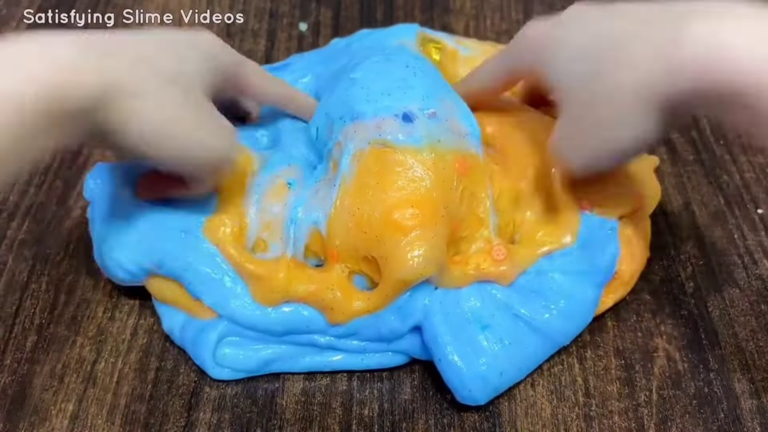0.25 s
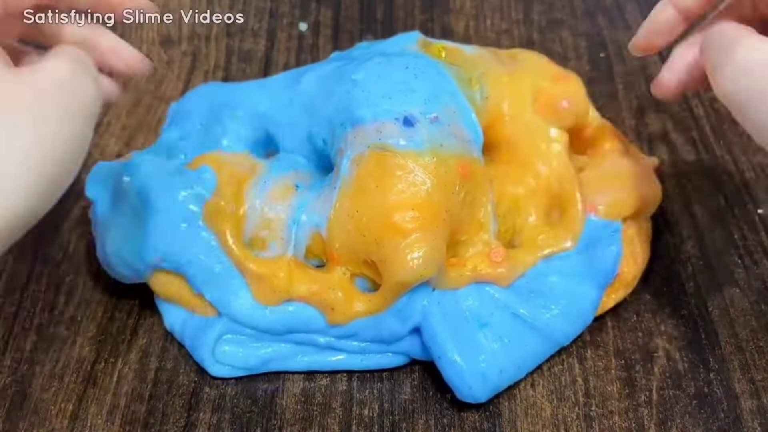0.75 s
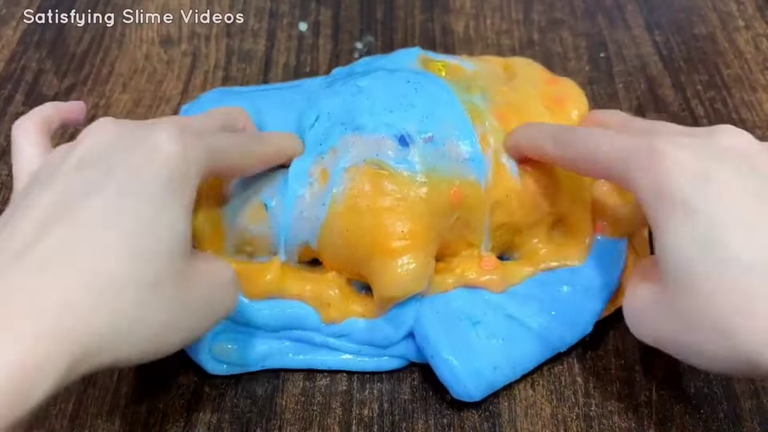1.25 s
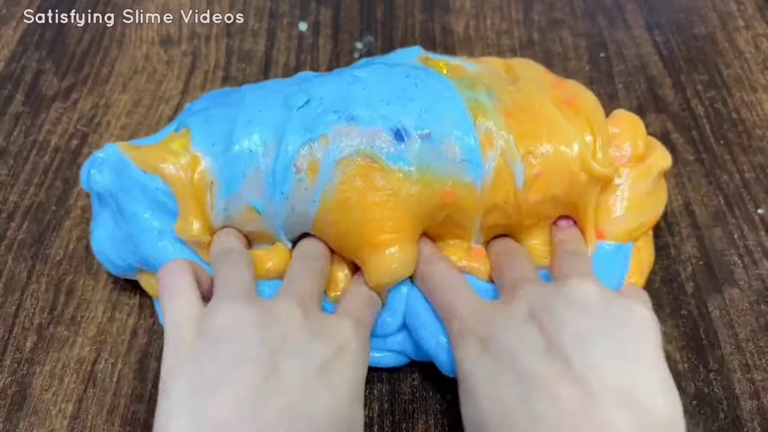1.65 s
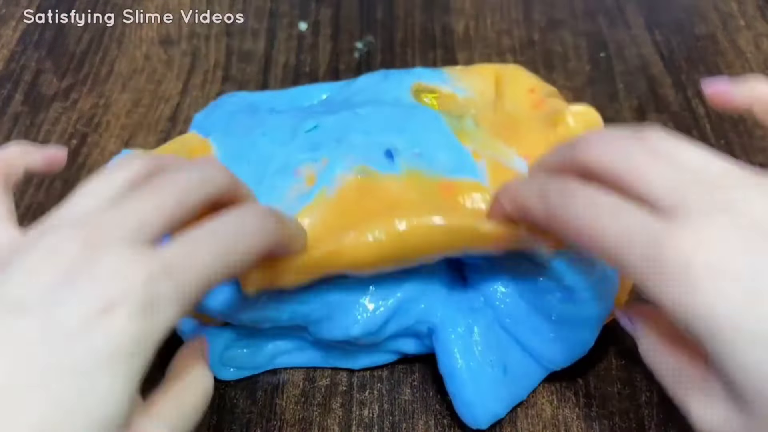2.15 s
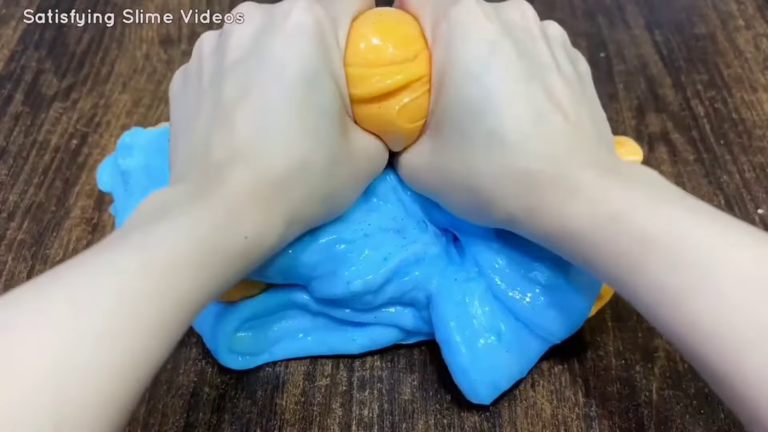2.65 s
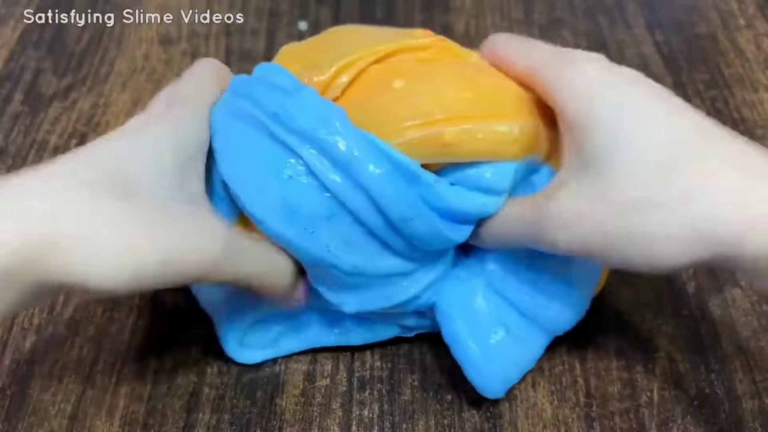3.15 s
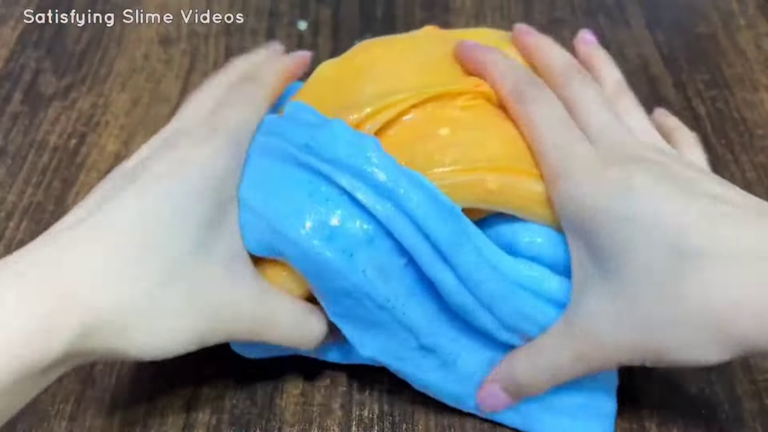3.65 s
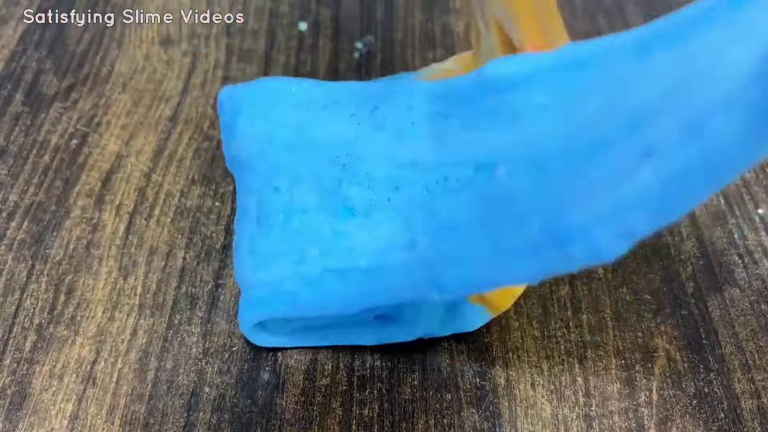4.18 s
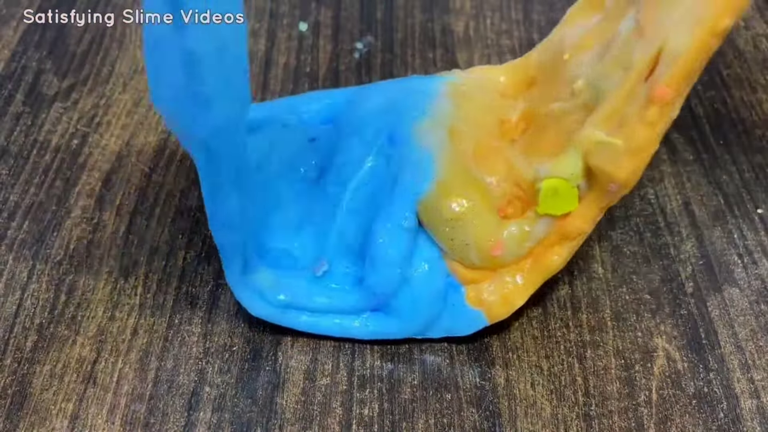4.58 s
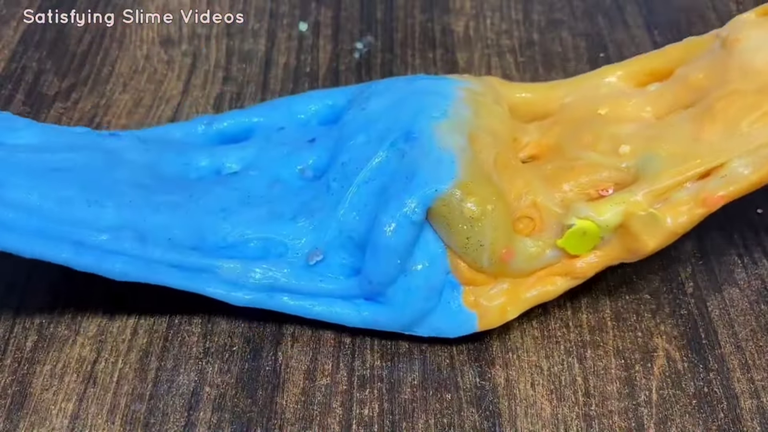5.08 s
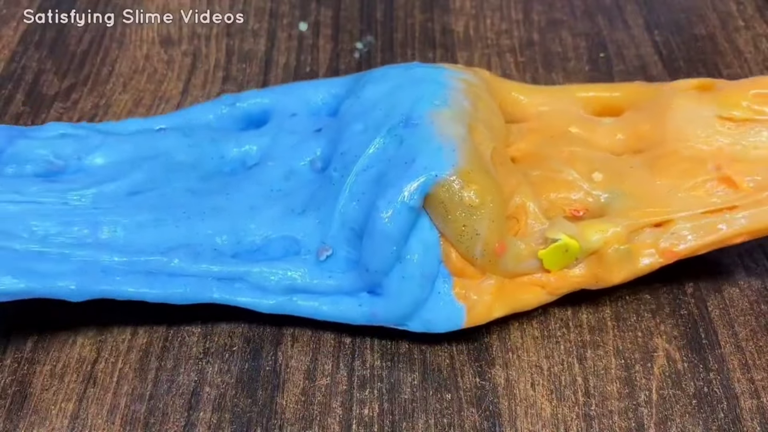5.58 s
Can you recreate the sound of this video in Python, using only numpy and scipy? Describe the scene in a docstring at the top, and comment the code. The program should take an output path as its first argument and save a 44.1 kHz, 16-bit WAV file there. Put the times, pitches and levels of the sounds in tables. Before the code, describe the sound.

Very close, dry indoor stereo of glossy slime handled on a wooden table. Uneven wet squelches and bright bubble crackles start with a poke, peak in loud snaps near 0.8 and 1.5 seconds, continue as busy squeezing and folding with popping air, then drop after four seconds to faint ticks and fizz during stretching.

```python
"""A lump of wet slime on a table, close to the microphone, is poked, folded and stretched by two hands.
Each squeeze drives trapped air out in a squelch (sputtering noise through a hollow) and bursts a fizz of bubbles;
narrow folds sing as gliding resonances, larger pockets pop one by one as a noisy snap and a short ring.
The pressed mass thuds softly as low noise and brief swings, over a faint room tone.
At the end the slime is pulled into a sheet and only ticks and fizzes."""
import sys
import numpy as np
from scipy import signal
from scipy.fft import rfft, irfft, next_fast_len
from scipy.io import wavfile
from scipy.ndimage import uniform_filter1d, map_coordinates

SR = 44100
rng = np.random.default_rng(int(sys.argv[2]) if len(sys.argv) > 2 else 0)


def waveform_to_disk(signal):
    """Save audio, clipped to [-1, 1], as 16-bit WAV at the path in sys.argv[1]."""
    frames = np.transpose(np.atleast_2d(signal))
    scaled = np.clip(frames, -1, 1) * 32767
    samples = np.round(scaled).astype(np.int16)
    wavfile.write(sys.argv[1], SR, samples)


N = 256662

# strokes of the hands, squeezing or pulling; levels stand before each layer's gain:
# (full at [s], swell [s per 20 dB], hold [s], release of the fizz [s per 20 dB],
#  fizz level [dB], fizz tilt [dB per octave], squelch level [dB], squelch pitch [Hz])
HAND_STROKES = [(0.003, 0.109, 0.105, 0.034, -49.6, -2.1, -51.5, 600.0),
                (0.111, 0.028, 0.009, 0.008, -48.3, -4.8, -47, 480),
                (0.221, 0.047, 0.021, 0.038, -29.6, -1.0, -37.4, 540.0),
                (0.349, 0.055, 0.006, 0.032, -54.7, 1.1, -69.8, 570.0),
                (0.441, 0.052, 0.007, 0.028, -62.1, -0.1, -53.7, 400.0),
                (0.829, 0.043, 0.016, 0.03, -18.3, 0.7, -27.3, 580.0),
                (0.997, 0.044, 0.006, 0.045, -74.8, -3.5, -59, 200.0),
                (1.137, 0.472, 0.023, 0.051, -63.1, 0.4, -68, 760.0),
                (1.485, 0.042, 0.009, 0.031, -21.3, -1.3, -26, 520),
                (1.529, 0.042, 0.006, 0.029, -28.3, 0.1, -39.1, 380.0),
                (1.816, 0.203, 0.006, 0.074, -43.5, 4.3, -56.9, 950.0),
                (1.924, 0.135, 0.107, 0.044, -53.5, 2.1, -66.3, 710.0),
                (2.146, 0.157, 0.005, 0.043, -49.2, -0.5, -62.4, 1130.0),
                (2.22, 0.039, 0.004, 0.032, -45.5, 2.3, -57.8, 1000.0),
                (2.28, 0.056, 0.059, 0.051, -35.8, -1.6, -41, 1420.0),
                (2.369, 0.047, 0.02, 0.023, -39.9, 3.0, -55.6, 780.0),
                (2.492, 0.095, 0.01, 0.027, -47.4, -0.4, -52.8, 1560.0),
                (2.59, 0.137, 0.07, 0.031, -52.7, 0.9, -54.4, 600.0),
                (2.738, 0.126, 0.005, 0.063, -44.0, 3.0, -47.7, 680.0),
                (2.829, 0.173, 0.075, 0.056, -59.3, -0.4, -61.5, 1200.0),
                (3.08, 0.051, 0.054, 0.05, -29.8, -3.4, -31.2, 1140.0),
                (3.275, 0.129, 0.001, 0.056, -38.6, -1.7, -45.9, 1440.0),
                (3.305, 0.048, 0.11, 0.045, -46.4, -0.6, -45.7, 760.0),
                (3.455, 0.05, 0.02, 0.032, -27.0, -2.8, -31.7, 810.0),
                (3.534, 0.059, 0.005, 0.048, -39.3, 3.0, -49.8, 600.0),
                (3.592, 0.076, 0.003, 0.019, -48.1, -0.6, -58.8, 570.0),
                (3.772, 0.12, 0.037, 0.042, -48.9, 1.2, -51.7, 980.0),
                (3.906, 0.09, 0.01, 0.052, -43.6, -1.7, -47.4, 1230.0),
                (4.322, 0.3, 0.012, 0.066, -73, 0.5, -78, 580.0),
                (4.446, 0.114, 0.006, 0.024, -56.8, -1.6, -69.2, 1180.0),
                (4.947, 1.03, 0.123, 0.081, -61.9, -0.1, -76, 640.0),
                (5.285, 0.155, 0.03, 0.047, -69.9, -3.0, -77.5, 790.0),
                (5.499, 0.6, 0.049, 0.045, -66.7, -0.4, -74, 740.0),
                (5.614, 0.095, 0.019, 0.043, -58.2, -4.5, -63.1, 1560.0),
                (5.745, 0.129, 0.051, 0.04, -53.1, -1.6, -59.7, 1270.0)]
# the mass pressed on the table: (time [s], pitch [Hz], level before each layer's gain [dB])
TABLE_PRESSES = [(0.045, 120, -52), (0.11, 100, -58), (0.208, 122, -32), (0.56, 48, -60), (0.59, 55, -61),
                 (0.684, 50, -62), (0.815, 150, -49), (0.935, 110, -45), (0.985, 56, -34.5),
                 (1.47, 120, -40), (2.28, 92, -57), (2.585, 110, -60), (3.08, 137, -48), (3.335, 110, -58),
                 (3.585, 58, -55), (3.696, 84, -60), (3.78, 96, -61)]
# air pockets bursting, before the pops' own gain and stretches:
# (time [s], cavity pitch [Hz], length [ms], level over 2 ms [dB], snap tilt [dB per octave])
AIR_POCKETS = [(0.2295, 6070, 1.3, -15, 0), (0.354, 6320, .8, -48, 5), (0.4282, 7180, .5, -52.5, 3),
               (0.4477, 7430, .4, -43, -2.5), (0.8196, 6580, .9, -16, 1), (0.824, 6520, 1.0, -16, .5),
               (0.8454, 435, 2.2, -19, -4.5), (0.8499, 6250, 2.4, -16, -.5), (1.0492, 430, 1.3, -35.5, -8),
               (1.1731, 7220, .5, -51, 2), (1.2466, 1194, .9, -56, -3.5), (1.4759, 679, 2.4, -18, 1),
               (1.4791, 7350, .45, -14.5, -1), (1.4839, 7540, .9, -21, -2.5), (1.4963, 5120, .6, -14.5, 3),
               (1.5316, 5320, 1.0, -23.5, 3), (1.709, 7800, .8, -45, -3.5), (1.9278, 7570, .5, -39, 3.5),
               (1.9759, 7490, .4, -31, 9), (2.0297, 6910, .5, -45, 2.5), (2.0584, 3430, .8, -46, 4),
               (2.147, 2640, .5, -49, -2), (2.5882, 451, 1.6, -43, 0), (2.64, 2070, .8, -41, -3.5),
               (2.659, 6600, .9, -43, -1), (2.7477, 7360, 2.2, -38, -1.5), (2.8274, 2090, .6, -43, -.5),
               (3.0873, 3570, 2.0, -17.5, -3.5), (3.2801, 3900, .55, -21, 1.5),
               (3.3481, 1086, .7, -25.5, -6), (3.4598, 3780, .3, -16, -3.5), (3.4776, 3998, .3, -9, -.5),
               (3.536, 7660, .6, -25, 8), (3.5948, 7700, 1.5, -35, 1.5), (3.6472, 1394, .45, -41.5, -2),
               (3.809, 7060, .5, -43, 2), (3.906, 2480, 1.0, -32, -3.5), (4.3299, 7370, .5, -51, 4.5),
               (4.4495, 3104, 1.0, -45.5, 2), (4.6842, 6060, .9, -55, 6.5), (4.9339, 6370, .6, -51, 5.5),
               (4.9744, 5790, 1.0, -45, .5), (5.1272, 2820, 1.5, -51, 0), (5.4433, 6800, .6, -52, 7.5),
               (5.5031, 7590, .7, -48, 10), (5.6131, 6450, .6, -50, -.5), (5.7688, 4010, .4, -41, 1.5)]
# narrow air channels that sing as they are squeezed, before their gain:
# (start [s], end [s], start pitch [Hz], end pitch [Hz], level relative to the stroke [dB])
AIR_CHANNELS = [(0.73, 0.86, 330, 400, -15), (0.93, 1.04, 190, 520, 8), (1.491, 1.55, 334, 310, -15),
                (1.98, 2.025, 606, 600, -10.5), (2.24, 2.32, 1760, 1750, -5.5),
                (2.25, 2.345, 1020, 1200, -9), (2.304, 2.37, 2000, 2480, -1), (2.86, 2.93, 1030, 1800, -7),
                (3.088, 3.155, 2180, 1950, -6), (3.2, 3.295, 3150, 4350, -6),
                (3.469, 3.505, 3737, 4500, -4), (3.5, 3.56, 5500, 7900, -10.5), (3.68, 3.77, 563, 1250, -6),
                (3.92, 3.975, 2350, 1850, -1), (5.725, 5.795, 2400, 2200, -8)]
# relative tone of a tearing wet film at the microphone: (frequency [Hz], level per Hz [dB])
FILM_TONE = [(150.0, -18), (400.0, -6), (1700.0, -8.0), (2500.0, -4.5), (4200.0, -3), (5400.0, -5.0),
             (6600.0, -2), (7900.0, -3), (8700.0, -13), (9700.0, -25.5), (11000.0, -11), (12500.0, -7.5),
             (14800.0, -10), (16000.0, -22)]
# stereo width at the microphone: (frequency [Hz], side minus mid [dB])
STEREO_WIDTH = [(60, -11), (110, -8), (200, -7), (380, -8), (700, -6), (1290, -4), (2380, -4), (4400, -3),
                (8120, -4), (15000, -1)]
# relative tone of the room noise: (frequency [Hz], level per Hz [dB])
ROOM_SPECTRUM = [(15, -30), (25, 0), (80, 0), (677, -9.5), (1260, -14.5), (3920, -10), (5140, -14),
                 (6920, -11.5), (8140, -15), (9840, -29.5), (11600, -18.5), (14800, -13), (16000, -31)]

ROOM_TONE_DB = -75
CUTOFF_HZ = 15900
SWELL_POWER = .9   # under 1, a stroke steepens towards its peak
SQUELCH_HASTE = 1.28   # the squelch dies this much faster than the fizz
# every stroke also drags the mass, by a share of the squelch's swing in dB
DRAG_DB, DRAG_FOLLOWS, DRAG_HZ = -38, .58, 70
PRESS_RISE_DB_PER_S, PRESS_FALL_DB_PER_S = 380, 480
# the smaller the pocket, the higher its pitch and the more it snaps rather than rings
POCKET_HZ, SNAP_DB_PER_OCTAVE = 3400, 1.2


def from_db(db):
    """Decibels to gain."""
    return 10 ** (np.asarray(db) / 20)


def rms_one(x):
    """Scale to unit power."""
    return x / np.sqrt(np.mean(x ** 2) + 1e-20)


def at_hz(points, hz):
    """A spectrum table read on a log-frequency axis."""
    known, values = np.transpose(points)
    return np.interp(np.log(hz + 1), np.log(known), values)


def resonance(hz, centre_hz, q):
    """Gain of a damped cavity."""
    return 1 / np.sqrt(1 + (q * (hz / centre_hz - centre_hz / hz)) ** 2)


def film(hz, tilt_db):
    """Gain of bursting film; a positive tilt, as of thinner film, favours the treble."""
    octaves = np.log2(np.clip(hz, 300, 16000) / 1000)
    return from_db(at_hz(FILM_TONE, hz) + tilt_db * octaves)


def hollows(hz, s, depth_db, width_hz, life_s):
    """Gain of the many shifting hollows between the fingers: peaks and dips that come and go."""
    field = rng.standard_normal((400, 400))
    where = np.broadcast_arrays(hz / width_hz, s / life_s)
    return from_db(depth_db * map_coordinates(field, where, order=3, mode="wrap"))


def stereo_noise():
    """Noise of unit power, more alike in both channels in the bass and wide in the treble."""
    size = next_fast_len(N)
    mid, side = rfft(rng.standard_normal((2, size)))
    width = from_db(at_hz(STEREO_WIDTH, np.fft.rfftfreq(size, 1 / SR)))
    left_right = mid + side * width * [[1], [-1]]
    return irfft(left_right / np.sqrt(1 + width ** 2), size)[:, :N]


def moving_filter(x, gain_at, size):
    """Colour x by gain_at(Hz, s), scaled so that white noise keeps its power."""
    hz, s, frames = signal.stft(x, SR, nperseg=size)
    gain = gain_at(hz[:, None] + 1, s)
    gain = gain / np.sqrt(np.mean(gain ** 2, axis=0))
    return signal.istft(frames * gain, SR, nperseg=size)[1][:, :x.shape[1]]


def swarm(per_s, spread_db, grain_ms, smooth_share):
    """Tiny bursts of uneven size, each dying quickly, over a blur of still smaller ones."""
    struck = rng.random(N) < per_s / SR
    energy = struck * from_db(spread_db * np.minimum(rng.exponential(1, N), 4)) ** 2
    decay = np.exp(-1e3 / (grain_ms * SR))
    power = signal.lfilter([1], [1, -decay], energy + 1e-18)
    power = power / uniform_filter1d(power, size=1800)   # the hand, not chance, sets the loudness
    share = np.clip(smooth_share, 0, 1)
    return stereo_noise() * np.sqrt(share + (1 - share) * np.abs(power))


def strokes(s, haste, levels_db, colours):
    """Each stroke swells, holds and falls away; gives their joint gain and the colour of those that prevail."""
    full_s, swell_s, hold_s, release_s = np.transpose(HAND_STROKES)[:4, :, None]
    coarse = np.arange(0, N / SR, .001)
    swell_db = 20 * (np.maximum(full_s - coarse, 0) / swell_s) ** SWELL_POWER
    fall_db = 20 * haste / release_s * np.maximum(coarse - full_s - hold_s, 0)
    power = from_db(levels_db[:, None] - swell_db - fall_db) ** 2 + 1e-20
    total = power.sum(axis=0)
    gain = np.interp(s, coarse, np.sqrt(total))
    return gain, np.interp(s, coarse, colours @ power / total)


def fizzing(s):
    """Gain and tilt of the fizz at the times s."""
    *_, level_db, tilt_db, _, _ = np.transpose(HAND_STROKES)
    return strokes(s, 1, level_db, tilt_db)


def squelching(s):
    """Gain and pitch of the squelch at the times s."""
    *_, level_db, pitch_hz = np.transpose(HAND_STROKES)
    return strokes(s, SQUELCH_HASTE, level_db, pitch_hz)


def pressing(s):
    """Presses build up and ease off over the drag of the strokes; gives joint gain and prevailing pitch."""
    at_s, pitch_hz, level_db = np.transpose(TABLE_PRESSES)[:, :, None]
    coarse = np.arange(0, N / SR, .001)
    rise_db = PRESS_RISE_DB_PER_S * (at_s - coarse)
    fall_db = PRESS_FALL_DB_PER_S * (coarse - at_s)
    power = from_db(level_db - np.maximum(rise_db, fall_db)) ** 2
    drag = (from_db(DRAG_DB) * squelching(coarse)[0] ** DRAG_FOLLOWS) ** 2
    total = power.sum(axis=0) + drag
    mean_hz = ((pitch_hz * power).sum(axis=0) + DRAG_HZ * drag) / total
    return np.interp(s, coarse, np.sqrt(total)), np.interp(s, coarse, mean_hz)


def room_tone():
    """Faint steady noise of the room."""
    def colour(hz, s):
        return from_db(at_hz(ROOM_SPECTRUM, hz))
    return from_db(ROOM_TONE_DB) * moving_filter(stereo_noise(), colour, size=2048)


def fizz(low_edge_hz=2000, gain_db=-1.54):
    """Small bubbles break as sticky faces meet and part."""
    def colour(hz, s):
        ripple = hollows(hz, s, depth_db=3.0, width_hz=300, life_s=.045)
        return ripple * film(hz, fizzing(s)[1]) / np.sqrt(1 + (low_edge_hz / hz) ** 8)
    grains = swarm(per_s=940, spread_db=4.0, grain_ms=.3, smooth_share=0.61)
    level, _ = fizzing(np.arange(N) / SR)
    return from_db(gain_db) * level * moving_filter(grains, colour, size=512)


def squelch(q=0.62, low_edge_hz=245, high_edge_hz=2400, palm_hz=305, palm_q=2.0, palm_db=3.5,
            ripple_db=3.0, gain_db=-3.5):
    """Air sputters out of a fold, whose hollow changes pitch; the cupped hand adds a low resonance."""
    def colour(hz, s):
        edges = (1 + (low_edge_hz / hz) ** 8) * (1 + (hz / high_edge_hz) ** 8)
        palm = np.hypot(1, from_db(palm_db) * resonance(hz, palm_hz, palm_q))
        ripple = hollows(hz, s, depth_db=ripple_db, width_hz=190, life_s=.04)
        return ripple * palm * resonance(hz, squelching(s)[1], q) / np.sqrt(edges)
    grains = swarm(per_s=400, spread_db=4.0, grain_ms=.6, smooth_share=.4)
    level, _ = squelching(np.arange(N) / SR)
    return from_db(gain_db) * level * moving_filter(grains, colour, size=1024)


def thuds(q=0.37, overtone_ratio=2.7, flutter_db=2.5, flutter_s=.025, gain_db=-0.4):
    """The soft mass wobbles unevenly against the table under the knuckles."""
    def colour(hz, s):
        _, pitch_hz = pressing(s)
        return resonance(hz, pitch_hz, q) / np.sqrt(1 + (hz / (overtone_ratio * pitch_hz)) ** 6)
    s = np.arange(N) / SR
    wobble = moving_filter(stereo_noise(), colour, size=2048)
    # level the noise, so that presses and flutter set the loudness
    wobble = wobble / np.sqrt(uniform_filter1d(np.mean(wobble ** 2, axis=0), size=900))
    flutter = map_coordinates(rng.standard_normal(N), [s / flutter_s], order=1, mode="wrap")
    return from_db(flutter_db * flutter + gain_db) * pressing(s)[0] * wobble


def bumps(glide=0.21, length_ms=13.5, gain_db=-3):
    """At the height of a press the mass swings for a few cycles and stiffens as it is compressed."""
    s, out = np.arange(N) / SR, np.zeros(N)
    phases = rng.uniform(0, 2 * np.pi, len(TABLE_PRESSES))
    for (at_s, hz, level_db), phase in zip(TABLE_PRESSES, phases):
        age = (s - at_s) * 1e3 / length_ms   # in lengths of the bump
        near = np.abs(age) < 4
        turn = 2 * np.pi * np.cumsum(hz * (1 + glide * np.tanh(age[near]))) / SR
        bell = np.exp(-.5 * age[near] ** 2)
        out[near] += from_db(level_db + gain_db) * bell * np.sin(turn + phase)
    return out


def pops(opening=1.02, ring_stretch=1.2, snap_stretch=1.0, glide=0.069, skirt_db=-19, skirt_ms=4.0,
         low_edge_hz=380, gain_db=.5, snap_db=2.5, phase_spread=.35):
    """A pocket opens: its film snaps and its cavity rings, rising; a faint noise skirt lies before and after."""
    size = 2048
    ms = (np.arange(size) - size // 2) * 1e3 / SR
    hz = np.fft.rfftfreq(size, 1 / SR) + 1
    span = np.sqrt(.002 * SR / size)   # the level over 2 ms, as that of the whole window
    small_source = 1 / np.sqrt(1 + (low_edge_hz / hz) ** 6)   # radiates little bass
    out, noise = np.zeros((2, N + 2 * size)), stereo_noise()
    chance = rng.standard_normal((len(AIR_POCKETS), 2))
    age_ms = np.where(ms < 0, -ms / opening, ms)   # rises and falls at nearly the same rate
    for (s, cavity_hz, length_ms, level_db, tilt_db), (phase, skew) in zip(AIR_POCKETS, chance):
        at, length_ms = int(s * SR), max(length_ms, .2)
        octaves = np.log2(cavity_hz / POCKET_HZ)
        turn = 2 * np.pi * np.cumsum(cavity_hz * (1 + glide * np.tanh(ms / length_ms))) / SR
        ring = np.sin(turn + np.pi * phase + phase_spread * skew * np.array([[1], [-1]]))
        ring = ring * np.exp(-age_ms / (ring_stretch * length_ms))
        skirt = from_db(skirt_db) * np.exp(-age_ms / skirt_ms)
        burst = np.exp(-age_ms / (snap_stretch * length_ms)) + skirt
        snap = irfft(rfft(noise[:, at - size:at] * burst) * film(hz, tilt_db) * small_source)
        pop = rms_one(ring) + from_db(snap_db + SNAP_DB_PER_OCTAVE * octaves) * rms_one(snap)
        out[:, at:at + size] += span * from_db(level_db + gain_db) * rms_one(pop)
    return out[:, size // 2:size // 2 + N]


def channels(q=5.5, min_width_hz=120, gain_db=0.4):
    """Air forced through a narrow fold rings at a gliding pitch, as loud as the squeeze drives it."""
    s = np.arange(N) / SR
    squeeze = np.hypot(fizzing(s)[0], squelching(s)[0])
    sputter = swarm(per_s=270, spread_db=3, grain_ms=0.2, smooth_share=.4)
    out = np.zeros((2, N))
    for start, end, start_hz, end_hz, level_db in AIR_CHANNELS:
        at = np.arange(int(start * SR), int(max(end, start + .02) * SR))

        def colour(hz, age):
            centre_hz = start_hz * (end_hz / start_hz) ** (age * SR / len(at))
            return resonance(hz, centre_hz, np.minimum(q, centre_hz / min_width_hz)) ** 2
        swell = np.sqrt(np.sin(np.pi * (np.arange(len(at)) + .5) / len(at)))
        song = rms_one(moving_filter(sputter[:, at], colour, size=512))
        out[:, at] += from_db(level_db + gain_db) * swell * song
    return squeeze * out


def scene(left_db=.5):
    """The slime lies slightly to the left; the room is dry."""
    slime = fizz() + squelch() + thuds() + bumps() + pops() + channels()
    return room_tone() + slime * from_db([[left_db], [-left_db]])


def record(dry):
    """Full scale clips the peaks, then a steep low-pass cuts the top."""
    low_pass = signal.ellip(8, .1, 60, CUTOFF_HZ, fs=SR, output="sos")
    return signal.sosfiltfilt(low_pass, np.clip(dry, -1, 1))


dry = scene()
out = record(dry)
waveform_to_disk(out)
```